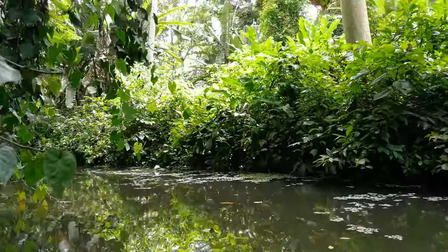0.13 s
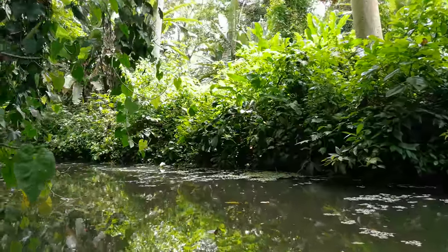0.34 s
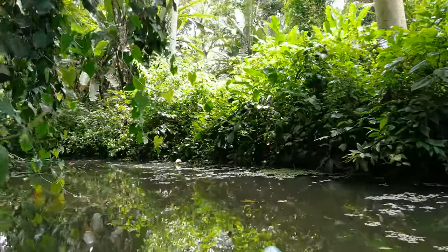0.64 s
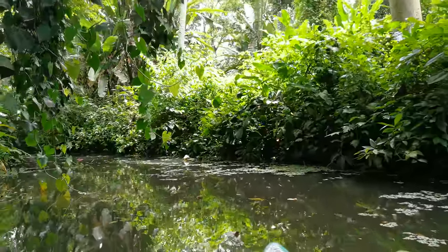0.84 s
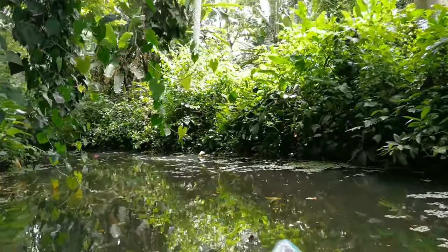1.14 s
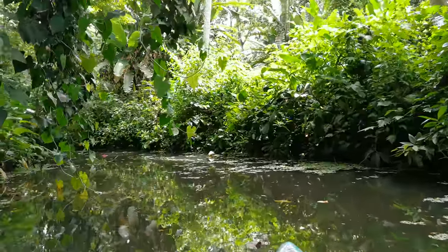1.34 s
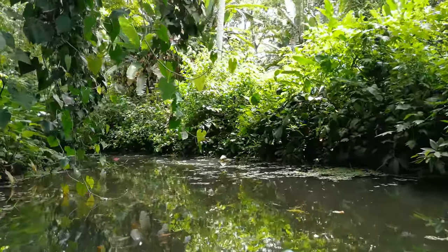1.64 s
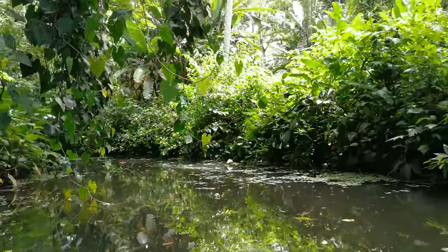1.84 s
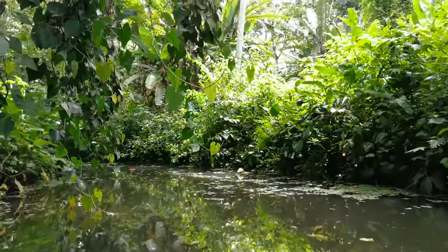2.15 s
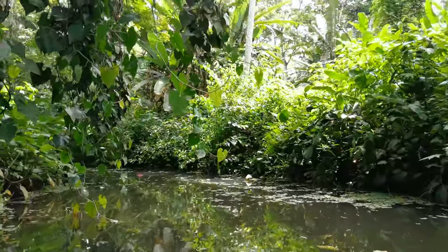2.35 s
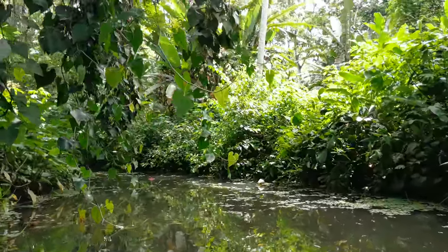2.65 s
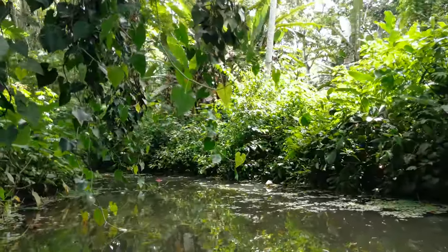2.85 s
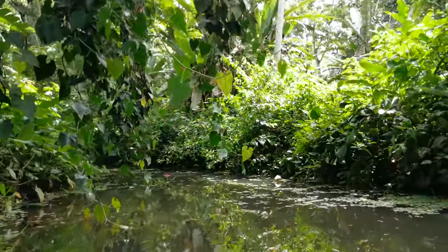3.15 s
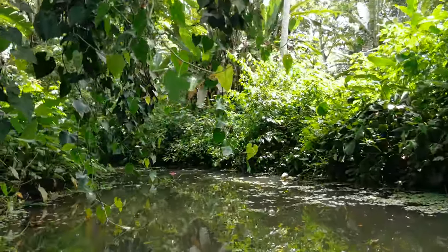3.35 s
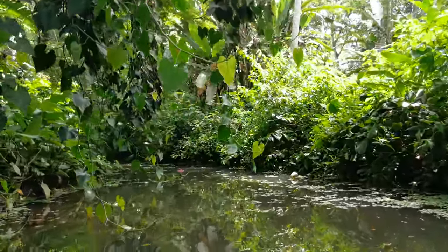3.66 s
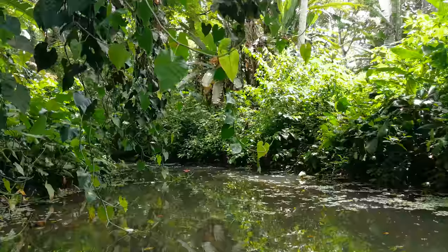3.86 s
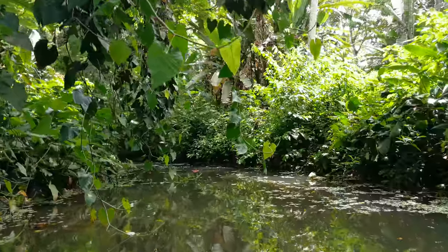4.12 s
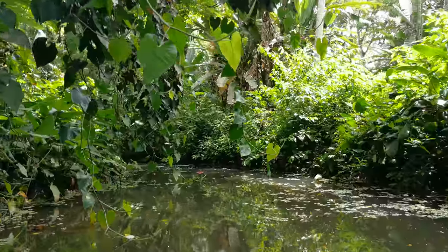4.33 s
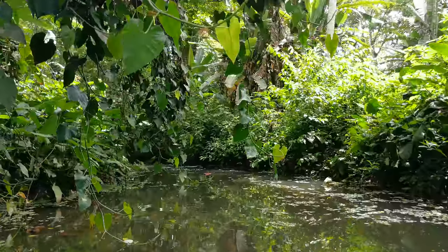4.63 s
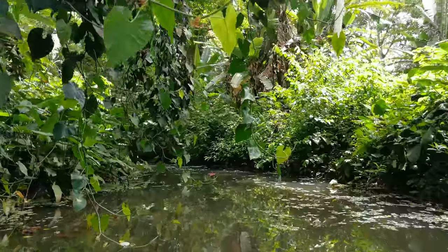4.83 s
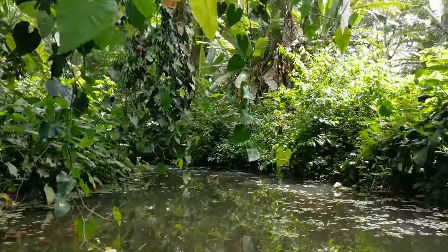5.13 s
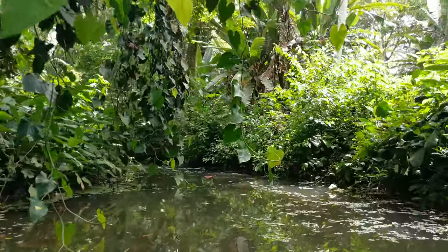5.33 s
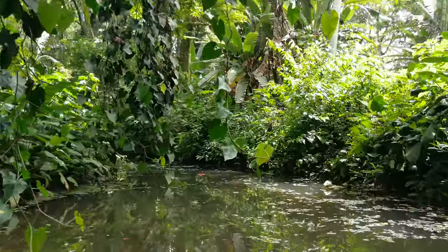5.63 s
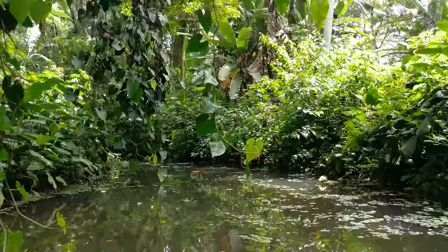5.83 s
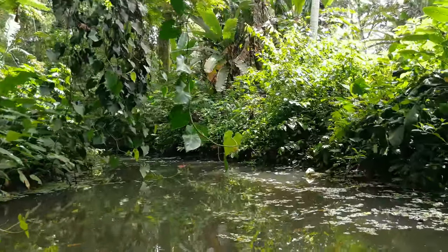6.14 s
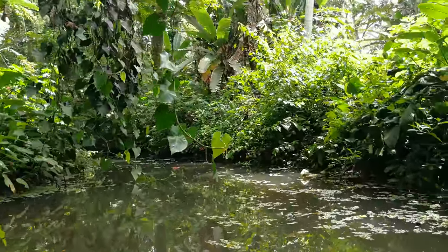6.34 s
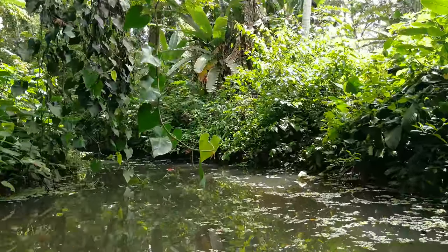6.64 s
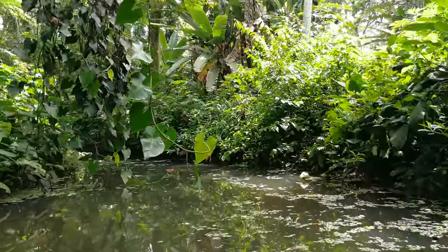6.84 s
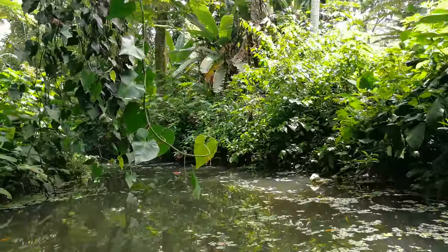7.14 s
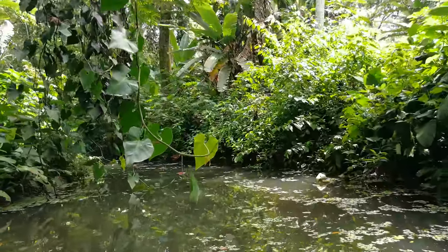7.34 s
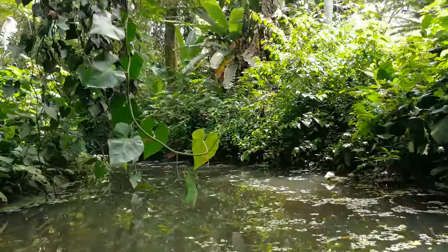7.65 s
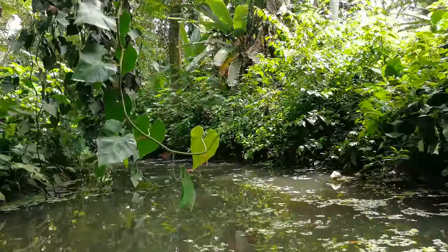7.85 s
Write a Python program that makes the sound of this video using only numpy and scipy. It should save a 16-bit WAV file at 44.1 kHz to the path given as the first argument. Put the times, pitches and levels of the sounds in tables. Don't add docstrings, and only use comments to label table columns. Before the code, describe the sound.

A dense, unbroken shrill of cicadas fills both banks of a jungle waterway, with faint taps, small splashes and dull wooden knocks from a canoe.

```python
import sys
import numpy as np
from scipy import signal
from scipy.fft import rfft, irfft, next_fast_len
from scipy.io import wavfile
from scipy.ndimage import uniform_filter1d, map_coordinates

SR = 44100
rng = np.random.default_rng(int(sys.argv[2]) if len(sys.argv) > 2 else 0)


def voltage_ratio(decibels):
    exponent = np.asarray(decibels, float) / 20
    return 10 ** exponent


def generate_wav(signal):
    frames = np.transpose(np.atleast_2d(signal))
    scaled = np.clip(frames, -1, 1) * 32767
    pcm = np.round(scaled).astype(np.int16)
    wavfile.write(sys.argv[1], SR, pcm)


N = 351918

# t/s, level/dB, left-right/dB
CROWD = [
    (0.0, -19, 0.3),
    (1.6, -19, 0.54),
    (3.3, -19, -0.15),
    (4.9, -19, -0.03),
    (6.6, -18, -0.87),
    (7.98, -18.5, -0.5),
]
# f/Hz, level/dB
SMALL_SONG = [(2000, -120), (3500, -57), (5500, -24.5), (6800, -18), (7800, -8.5), (8500, -5.5), (9450, -1),
              (10200, -4.5), (10800, -9.5), (12000, -21), (13000, -32), (14000, -34), (14700, -46),
              (15700, -29.5)]
# f/Hz, level/dB
LARGE_SONG = [(1200, -120), (2300, -50.5), (2900, -32), (3500, -11.5), (4200, -1), (4750, 4.5), (5300, 2),
              (6200, -17), (7500, -29), (9000, -38.5), (12000, -120)]
# f/Hz, left-right/dB
PORT_TILT = [(1000, 4.5), (4700, -1.3), (7000, 0), (9000, 2), (10500, 3), (12000, 6.5), (15000, 2.6)]
# f/Hz, left-right correlation
ALIKE = [(60, 0.98), (130, 1), (290, 0.86), (450, -0.39), (700, -0.395), (1000, -0.0069), (1400, 0.224),
         (2200, -0.197), (3000, 0.025)]

# t/s, level/dB, dulling/(dB per octave), nearest mode f/Hz
KNOCKS = [
    (5.653, -44, 5, 301),
    (5.697, -55, 4, 125),
    (5.899, -50, 3.5, 640),
    (5.918, -52.5, 2.5, 125),
    (5.973, -49, 5, 190),
    (6.019, -59.5, 5.5, 120),
]
# f/Hz, level/dB, t60/s
HULL = [(108.3, -2, 0.223), (127.6, 4, 0.154), (192.2, 2, 0.153), (279.7, 0, 0.237), (365, 3, 0.079),
        (484, 0, 0.092), (633.6, 2, 0.085), (764, 6, 0.044), (1000, -3.5, .04)]
# t/s, peak level/dB, f/Hz, low thud level/dB
TAPS = [
    (0.68, -46.5, 1086, -12),
    (0.829, -49.5, 1390, -9),
    (0.956, -48.5, 1062, -6.5),
    (1.295, -43, 1083, -13),
    (2.03, -55, 619, -10),
    (2.291, -49, 2110, -12.5),
    (6.578, -39.5, 2510, -35),
    (6.799, -53.5, 605, -12.5),
    (6.913, -55, 587, -15.5),
]
# t/s, peak level/dB, f/Hz
SPLASHES = [
    (3.056, -45.5, 808),
    (3.076, -42.5, 1136),
    (3.094, -47.5, 907),
    (3.127, -47, 1139),
    (3.158, -50.5, 1750),
    (4.467, -51.5, 1636),
]
# t/s, pulse length/s (negative: pitch sinks), level/dB, first f/Hz, far f/Hz
GURGLE = (7.06, -0.02, -62.5, 749.5, 2198)

# crest t/s, level/dB, fading time/s
WAVELETS = [(0.0, -80, 0.035), (0.31, -78, 0.15), (0.54, -68.5, 0.17), (0.69, -68.5, 0.096),
            (0.93, -67.5, 0.12), (1.35, -69, 0.136), (1.48, -65, 0.21), (1.73, -68.5, 0.238),
            (2.3, -68.5, 0.224), (2.47, -68.5, 0.1), (3.25, -67.5, 0.306), (3.49, -65.5, 0.108),
            (4.05, -76, .06), (4.3, -72.5, 0.1), (4.52, -63.5, 0.3), (4.78, -66.5, 0.158),
            (5.07, -68, 0.092), (5.26, -70, 0.107), (5.66, -71.5, 0.059), (5.9, -73.5, 0.058),
            (6.07, -69.5, .1), (6.57, -70, 0.085), (6.68, -67.5, 0.049), (6.95, -69, 0.144),
            (7.2, -66, 0.153), (7.76, -66.5, 0.123), (7.86, -64.5, 0.194)]
# f/Hz, level/dB
LAPPING = [(180, -25), (300, -6), (546, -3.5), (629, -1), (692, -2.5), (1120, -2), (2560, -2.5), (2900, -6),
           (3770, -30), (6380, -120)]
# t/s, level/dB, fading time/s
SHIFTS = [(0.53, -65, 0.049), (0.69, -68, 0.037), (0.85, -75, .03), (1.03, -70.5, .06), (1.18, -65, 0.052),
          (1.27, -63, 0.077), (1.53, -65, 0.067), (1.62, -59.5, 0.0506), (2.2, -77, 0.049),
          (2.5, -74.5, 0.108), (2.9, -72, 0.057), (3.15, -67, 0.044), (3.38, -68, 0.09), (3.53, -68, 0.072),
          (4.5, -73, 0.049), (4.68, -69, 0.071), (5.0, -58.5, 0.032), (5.1, -65, 0.1), (5.47, -68, 0.092),
          (5.79, -66.5, 0.041), (6.18, -71.5, 0.11), (6.45, -74, 0.103), (6.67, -72.5, 0.036),
          (7.19, -65.5, 0.033), (7.77, -65.5, 0.071), (7.94, -66, .08)]
# f/Hz, level/dB
RUB = [(59, -22.5), (100, -4.5), (140, -4.5), (188, -4), (215, -5), (257, -3.5), (373, -20), (412, -12),
       (450, -15.5), (580, -54.5), (990, -120)]

# t/s, level/dB, fading time/s
CALLS = [
    (1.75, -62, .08),
    (3.63, -58, 0.175),
    (4.04, -54, 0.27),
    (4.4, -55, 0.327),
    (5.15, -55.5, 0.44),
    (6.01, -50.5, 0.1),
    (6.15, -60.5, 0.73),
    (7.72, -61, 0.097),
    (7.97, -60, .1),
]
# f/Hz, level/dB
LEAVES = [(200, -19.5), (400, -1.5), (600, 2), (1100, -1), (2000, -6), (2800, -5.5), (3600, -8),
          (6000, -120)]
# f/Hz, level/dB
RUMBLE = [(8.8, -23.5), (15, 5), (75, 2), (102, 2), (158, -5.5), (200, -8.5), (260, -16), (440, -120)]
# t/s, level/dB
MOTOR = [(0.0, -84.5), (2.95, -85.5), (3.2, -69), (4.3, -68.5), (4.65, -61), (5.1, -68.5), (6.0, -62),
         (6.35, -73), (6.85, -62.5), (7.3, -79), (7.68, -67), (7.98, -73.5)]
# t/s, level/dB, fading time/s
UPPER_HUM = (2.86, -69.5, 2.34)


def unit(x):
    return x / np.sqrt(np.mean(x ** 2) + 1e-20)


def along(points, hz):
    f, v = np.transpose(points)
    return np.interp(np.log(hz + 1), np.log(f + 1), v)


def curves(rows):
    s, *cols = np.transpose(rows)
    return [np.interp(np.arange(N) / SR, s, c) for c in cols]


def filtered(x, response):
    m = next_fast_len(N + 8192)
    return irfft(rfft(x, m) * response(np.fft.rfftfreq(m, 1 / SR)), m)[..., :N]


def patchy(pair, patchy_db, size):
    z = signal.stft(pair, nperseg=512)[2]
    field = rng.standard_normal(z.shape[1:])
    field = uniform_filter1d(field, size[0], 0)
    field = uniform_filter1d(field, size[1], 1)
    return signal.istft(z * voltage_ratio(patchy_db * unit(field)), nperseg=512)[1][:, :N]


def spread(pair, colour):
    def mid_side_gain(hz):
        turn = np.arccos(np.clip(along(ALIKE, hz), -1, 1)) / 2
        return voltage_ratio(along(colour, hz)) * [np.cos(turn), np.sin(turn)]

    mid, side = filtered(pair, mid_side_gain)
    return unit(np.array([mid + side, mid - side]))


def swells(rows, rise_s, rest_db):
    t = np.arange(0, N + 64, 64) / SR
    power = voltage_ratio(2 * rest_db)
    for s, db, fade_s in rows:
        shape = np.where(t < s, ((t - s) / rise_s) ** 2, (t - s) / fade_s)
        power = power + voltage_ratio(2 * db) * np.exp(-2 * shape)
    return np.interp(np.arange(N) / SR, t, np.sqrt(power))


def add(track, s, sound):
    track[..., round(s * SR):][..., :sound.shape[-1]] += sound


def cicadas():
    crowd_db, pan_db = curves(CROWD)
    level_db = crowd_db + pan_db * [[.5], [-.5]]
    small = species(SMALL_SONG, click_hz=380, patchy_db=0.5066, count=188)
    large = species(LARGE_SONG, click_hz=260, patchy_db=1.03, count=141)
    return voltage_ratio(level_db) * small + voltage_ratio(crowd_db - 22) * large


def species(song, click_hz, patchy_db, count):
    rate = click_hz * voltage_ratio(rng.normal(0, 1.5, (count, 1)))
    gaps = np.abs(1 + .15 * rng.standard_normal((count, int(1.6 * click_hz * N / SR))))
    clicks = np.cumsum(gaps, axis=1) - 9 * rng.random((count, 1))
    at = (SR * clicks / rate).astype(int)
    size_db = rng.normal(0, 1.83, (count, 1)) + rng.normal(0, 1.5, at.shape)
    size = voltage_ratio(size_db) * rng.choice([-1, 1], at.shape)
    port_lag = 23
    lag = (np.arange(count) % (2 * port_lag + 1))[:, None]
    ports = []
    for i in (at + port_lag, at + lag):
        ports.append(np.bincount(np.clip(i, 0, N).ravel(), (size * (i > 0)).ravel())[:N])
    tilt = lambda hz: voltage_ratio(along(song, hz) + along(PORT_TILT, hz) * [[.5], [-.5]])
    return unit(filtered(patchy(np.array(ports), patchy_db, size=(8, 24)), tilt))


def boat():
    out, t = np.zeros((2, N + SR)), np.arange(SR // 2) / SR
    knocks(out, t)
    taps(out, t)
    splashes(out, t)
    gurgle(out, t)
    return out[:, :N]


def knocks(out, t):
    for s, db, dull_db, near_hz in KNOCKS:
        for hz, level, t60 in HULL:
            lead = 0.6 * (hz / 300) ** 1.4 * np.array([[.5], [-.5]])
            mode_hz = hz * voltage_ratio(rng.normal(0, 0.15))
            ring = np.sin(2 * np.pi * mode_hz * t + lead + rng.uniform(0, 3.9))
            scrape = signal.fftconvolve(rng.standard_normal(len(t)), np.hanning(SR // 50), "same")
            scuff = 1 + 0.544 * unit(scrape)
            near_db = 7 * np.exp(-(np.log2(hz / near_hz) / 0.28) ** 2)
            strength_db = db + 7.5 + level + near_db - dull_db * np.log2(hz / HULL[0][0])
            onset = 1 - np.exp(-(t / 0.00846) ** 2)
            add(out, s - .008, voltage_ratio(strength_db - 60 * t / t60) * onset * scuff * ring)


def taps(out, t):
    for s, db, hz, thud_db in TAPS:
        ring = np.sin(2 * np.pi * hz * t)
        ring += 0.51 * np.sin(2 * np.pi * 1.26 * hz * t)
        ring += 0.34 * np.sin(2 * np.pi * 0.857 * hz * t)
        fade = voltage_ratio(-60 * t * hz * min(1, hz / 1100) / 28)
        thud = voltage_ratio(thud_db - 60 * t / 0.062) * np.sin(2 * np.pi * 431 * t)
        onset = 1 - np.exp(-(t * hz / 1.41) ** 2)
        add(out, s + 0.022, voltage_ratio(db) * (1 - np.exp(-t / 0.0028)) * thud)
        add(out, s - .001, voltage_ratio(db) * onset * (fade * ring + thud))


def splashes(out, t):
    for s, db, hz in SPLASHES:
        pitch, wait, side = (v[:, None] for v in rng.random((12, 3)).T)
        age = np.maximum(t[:6000] - 0.039 * wait ** 2, 0)
        f = hz * voltage_ratio(9 * (pitch - 0.1655))
        bubbles = np.sin(2 * np.pi * f * age * (1 + 4 * age)) * np.exp(-age * f / 9)
        left, right = (bubbles * side).sum(axis=0), (bubbles * (side - .8)).sum(axis=0)
        band = signal.butter(2, [650, 1700], "band", fs=SR)
        spray = signal.lfilter(*band, rng.standard_normal((2, len(t))))
        add(out, s - .001, voltage_ratio(db - 0.5 - 60 * t / 0.345) * spray)
        add(out, s - .001, voltage_ratio(db - 4.0) * np.array([left, right]))


def gurgle(out, t):
    s, length, db, first_hz, far_hz = GURGLE
    u = np.minimum(t / length, 1)
    froth = unit(uniform_filter1d(rng.standard_normal((2, len(t))), size=150))
    glide = np.sin(2 * np.pi * np.cumsum(first_hz * (far_hz / first_hz) ** u) / SR)
    pulses = np.sqrt(np.abs(np.sin(np.pi * u))) * (u < 1)
    add(out, s, voltage_ratio(db) * pulses * froth * glide)


def lapping():
    grains = rng.standard_normal((2, N)) * (1 + 5 * (rng.random(N) < .004))
    lap = spread(patchy(grains, 2.08, size=(5, 12)), LAPPING)
    return voltage_ratio(4.5) * swells(WAVELETS, rise_s=0.0634, rest_db=-74) * lap


def planks():
    rub = spread(patchy(rng.standard_normal((2, N)), 3.3, size=(1, 8)), RUB)
    return voltage_ratio(2.0) * swells(SHIFTS, rise_s=0.0383, rest_db=-78.5) * rub


def drone():
    ring = filtered(rng.standard_normal((2, N)), lambda hz: 1 / (1 + ((hz - 3100) / 250) ** 2))
    buzz = unit(patchy(ring, 3.6, size=(2, 10)))
    return voltage_ratio(-3.0) * swells(CALLS, rise_s=0.044, rest_db=-71) * buzz


def motor():
    def hum(hz, width):
        return unit(filtered(rng.standard_normal(N), lambda f: 1 / (1 + ((f - hz) / width) ** 2)))

    lower = voltage_ratio(curves(MOTOR)[0]) * hum(hz=86.12, width=5.33)
    upper = swells([UPPER_HUM], rise_s=0.29, rest_db=-91) * hum(hz=149.1, width=5.8)
    return lower + upper


def leaves():
    return voltage_ratio(-73) * spread(patchy(rng.standard_normal((2, N)), 1.34, size=(3, 12)), LEAVES)


def rumble():
    return voltage_ratio(-68) * spread(rng.standard_normal((2, N)), RUMBLE)


def scene():
    return cicadas() + boat() + lapping() + planks() + drone() + motor() + leaves() + rumble()


def low_pass(x):
    return signal.sosfilt(signal.butter(12, 15760, fs=SR, output="sos"), x)


def record(dry):
    rounded = dry / (1 + np.abs(dry / .56) ** 6) ** (1 / 6)
    top = filtered(rounded, lambda hz: 1 / (1 + (13150 / (hz + 1)) ** 90))
    wander = map_coordinates(rng.standard_normal(300), [np.arange(N) * 26 / SR])
    kept = voltage_ratio(np.clip(22 * wander - 12, -30, 0))
    return low_pass(rounded + (kept - 1) * top)


dry = scene()
out = record(dry)
generate_wav(out)
```